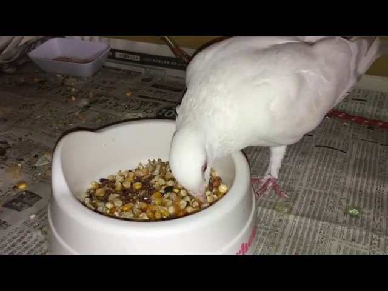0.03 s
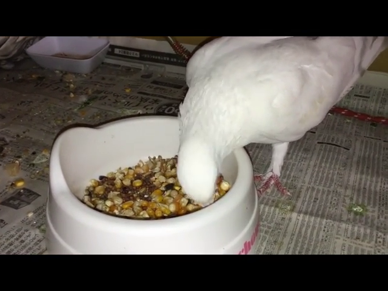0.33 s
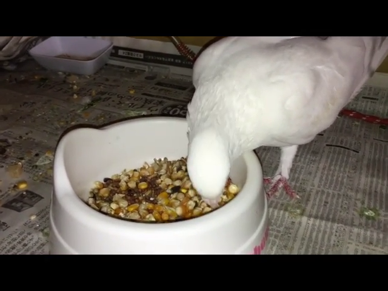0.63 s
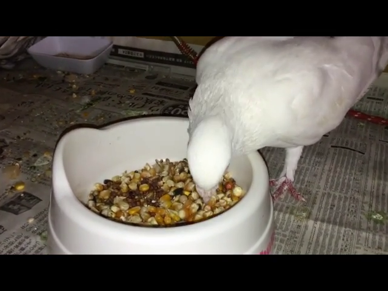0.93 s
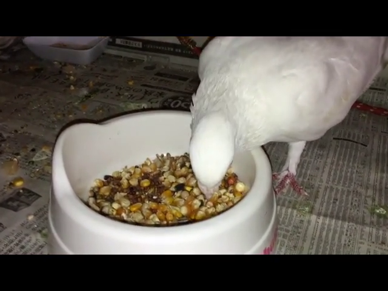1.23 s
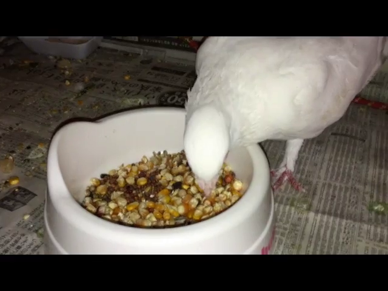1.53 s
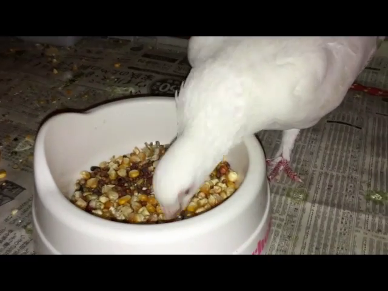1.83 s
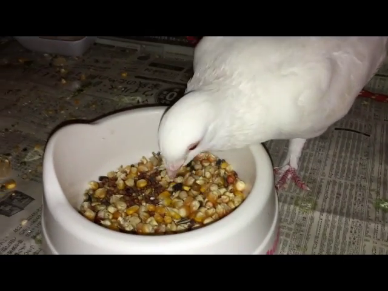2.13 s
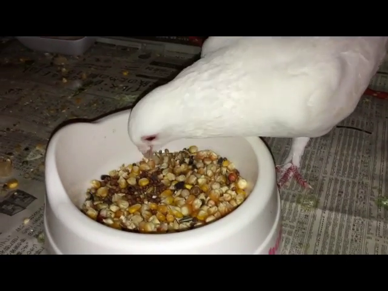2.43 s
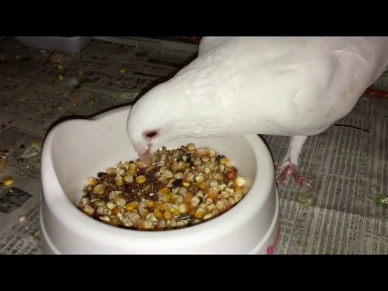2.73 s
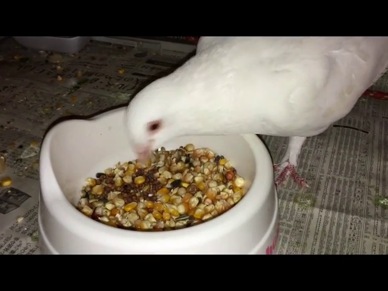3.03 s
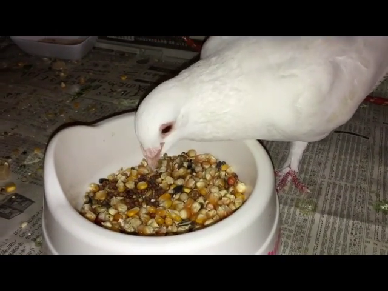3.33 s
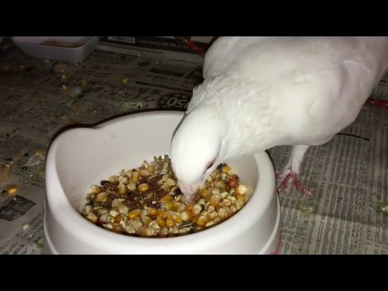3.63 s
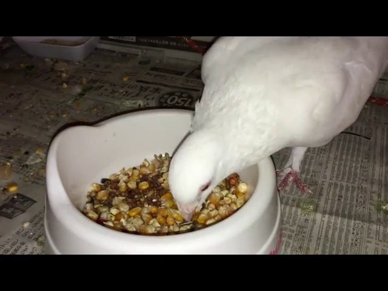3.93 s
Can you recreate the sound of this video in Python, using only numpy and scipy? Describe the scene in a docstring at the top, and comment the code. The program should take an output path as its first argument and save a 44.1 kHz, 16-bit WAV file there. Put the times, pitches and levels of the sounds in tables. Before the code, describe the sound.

A pigeon pecks dry seeds in a plastic bowl, close up in a small room. Short rattles and knocks give way to sparse beak clicks, then one harder knock, while a fan hums and hisses faintly.

```python
"""A pigeon feeds from a plastic bowl of dry seeds, close up in a small room.
From the start a slow fan throbs in the background, with a faint whine and hiss.
For a second the beak digs in: seeds rattle against each other and knock the bowl. After a pause
comes a short dig near 2 s, then sparse dry clicks as the beak snaps on single seeds.
A last dig near 3.9 s lands the hardest knock on the bowl."""
import sys
import numpy as np
from scipy import signal
from scipy.fft import rfft, irfft
from scipy.io import wavfile

SR = 44100
rng = np.random.default_rng(int(sys.argv[2]) if len(sys.argv) > 2 else 0)


def to_wav(s):
    """Save 16-bit WAV."""
    ch = np.atleast_2d(s).T  # columns
    pcm = np.round(np.clip(ch, -1, 1) * 32767)  # PCM
    wavfile.write(sys.argv[1], SR, pcm.astype(np.int16))


N = 176400
TIME = np.arange(N) / SR
FAN_WAVER_HZ = 2.9  # how fast the hum and the whine wander


def from_db(db):
    """Decibels to gain."""
    return 10 ** (np.asarray(db) / 20)


def rms_one(x):
    """Scale to unit rms."""
    return x / np.sqrt(np.mean(x ** 2) + 1e-20)


def at_hz(curve, hz):
    """Read an EQ curve in dB on a log-frequency axis."""
    corners_hz, db = np.transpose(curve)
    return np.interp(np.log(hz + 1e-9), np.log(corners_hz), db)


def noise(colour):
    """Steady noise shaped by an EQ curve, rms 1."""
    hz = np.arange(N // 2 + 1) * SR / N
    white = rfft(rng.standard_normal(N))
    return rms_one(irfft(white * from_db(at_hz(colour, hz)), N))


def drift(rate_hz, size=1024):
    """Smooth random modulation, rms about 1, rolling off above rate_hz."""
    hz = np.arange(size // 2 + 1) * SR / N
    slow = irfft(rfft(rng.standard_normal(size)) / (1 + (hz / rate_hz) ** 2), size)
    return np.interp(np.arange(N) * size / N, np.arange(size), rms_one(slow))


def band(x, hz, width_hz):
    """A resonant band-pass with unity gain at its peak."""
    r = np.exp(-np.pi * abs(width_hz) / SR)
    rung = signal.lfilter([(1 - r * r) / 2], [1, -2 * r * np.cos(2 * np.pi * hz / SR), r * r], x + 1e-18)
    return np.convolve(rung, [1, 0, -1])[:len(x)]


def low_cut(x, hz):
    """Thin out the low end: small bodies radiate little bass."""
    return signal.sosfilt(signal.butter(2, hz, "high", fs=SR, output="sos"), x + 1e-12)


def strike(times, levels_db, ratios, modes):
    """Each blow rings every mode with a strength and a slight lag of its own."""
    max_lag_s, spread_db = 0.0005, 2.0
    out, t = np.zeros(N + SR), TIME[:SR // 20]
    hz, db, t60 = np.transpose(modes)[:, :, None]
    for start, level_db, ratio in zip(times, levels_db, ratios):
        lag = max_lag_s * rng.random(hz.shape) * hz / hz.max()
        age = np.maximum(t - lag, 0)
        gain = from_db(level_db + db + spread_db * rng.standard_normal(hz.shape))
        rings = gain * np.exp(-np.log(1000) * age / t60) * np.sin(2 * np.pi * hz * ratio * age)
        out[int(start * SR):int(start * SR) + len(t)] += rings.sum(axis=0)
    return out[:N]


def fan():
    """Wavering harmonics of the blade rate and air rumble throb unevenly under a steady hiss."""
    # hum of the blades: (multiple of the blade rate, rms level [dB])
    harmonics = [(3, -79.5), (4, -78), (5, -77), (6, -72), (7, -67.5), (8, -71), (9, -61.5), (10, -63.5),
                 (11, -60.5), (12, -55.5), (13, -65.5), (15, -72)]
    # low air noise of fan and room: (frequency [Hz], relative level [dB])
    rumble_colour = [(20, -34), (32, -30), (48, -10), (85, -9), (115, -3), (155, -4.5), (192, 1.5),
                     (215, -5.5), (260, -13), (325, -14.5), (400, -22), (620, -29), (1200, -51)]
    # airy hiss: (frequency [Hz], relative level [dB])
    hiss_colour = [(300, -7), (620, -7.5), (800, 3), (1100, 0), (1400, -2.5), (2100, -6.5), (3300, -11.5),
                   (5000, -15), (6500, -15), (8000, -20.5), (9100, -15), (10300, -24.5), (12500, -20.5),
                   (16000, -29)]
    blade_hz, waver_db, waver_rad = 15.25, 1, 0.22
    rumble_db, hiss_db, throb_db = -55.5, -71, 1.4
    hum = from_db(rumble_db) * noise(rumble_colour)
    for multiple, db in harmonics:
        phase = 2 * np.pi * (round(multiple) * blade_hz * TIME + rng.random())
        phase += waver_rad * drift(FAN_WAVER_HZ)
        hum += np.sqrt(2) * from_db(db + waver_db * drift(FAN_WAVER_HZ)) * np.sin(phase)
    throb = from_db(throb_db * drift(rate_hz=14))
    return hum * throb + from_db(hiss_db) * noise(hiss_colour)


def whine():
    """Narrow bands of noise make a faint airy whine that swings up and down in pitch."""
    # bands of the whine: (centre [Hz], filter width [Hz], rms level [dB])
    bands = [(902.2, 35.5, -75), (981, 70, -79), (1081, 43, -78.5)]
    waver_db, pitch_swing, period_s, crest_s = 2.5, 0.0282, 0.43, 0.17
    out = np.zeros(N)
    for hz, width_hz, db in bands:
        narrow = band(rng.standard_normal(N), hz, width_hz)
        tone = rms_one(band(narrow, hz, 2 * width_hz))
        out += from_db(db + waver_db * drift(FAN_WAVER_HZ)) * tone
    speed = 1 + pitch_swing * np.cos(2 * np.pi * (TIME - crest_s) / period_s)
    return np.interp(np.cumsum(speed) % N, np.arange(N), out)  # varispeed vibrato


def room(x):
    """The direct sound, a few close reflections and a short dull tail."""
    # reflections off the bowl wall and floor: (delay [s], level [dB])
    echoes = [(.0017, -15.5), (.0045, -12.5), (.0069, -14.5)]
    t60_s, build_s, tail_db, damping_hz = 0.23, 0.0027, -16, 5970
    t = TIME[:SR // 2]
    tail = rng.standard_normal(len(t)) * np.exp(-np.log(1000) * t / t60_s) * np.minimum(t / build_s, 1)
    tail = signal.sosfilt(signal.butter(1, damping_hz, fs=SR, output="sos"), tail)
    response = from_db(tail_db) * tail / np.linalg.norm(tail)
    for delay, db in echoes:
        response[int(delay * SR)] += from_db(db)
    return x + signal.fftconvolve(x, response)[:N]


def beak_snaps():
    """The beak closes on one seed: a dry click layered from low thud, body and bright tip."""
    # snaps: (time [s], level [dB], thud offset [dB], tip offset [dB], pitch ratio)
    cues = [(0.031, -52.5, -4, 0, 0.88), (.6985, -49, 6, 4.5, .93), (0.7519, -59, 6, 9.5, 0.94),
            (0.9541, -46.5, 6, 10.5, .94), (2.0439, -47.5, -8, 5, 0.81), (2.0481, -50.5, 0, -1, 0.96),
            (2.095, -49.5, 9, -3, 1.06), (2.1485, -36.5, -7, 1, 1.02), (2.2648, -40.5, 7.5, 4.5, 1.02),
            (2.2758, -52, 8, 14, .98), (2.465, -60, 20, -8, 0.84), (2.6914, -55.5, -11, -6, 0.98),
            (3.1812, -59.5, 9, 8, 1.1), (3.5527, -41, 4, -12, .96), (3.612, -66, -4, -3, .9)]
    # modes of the three layers: (frequency [Hz], level [dB], t60 [s])
    thud_modes = [(736, -20, 0.02), (1140, -14, 0.017), (1300, -30, .015)]
    body_modes = [(2170, -14.5, 0.011), (3400, -5.5, 0.0063), (4270, -5, .005), (6350, -8.5, 0.0035),
                  (8950, -6.5, 0.0026)]
    tip_modes = [(11350, -10.5, 0.0035), (12900, -7, .003), (14600, -9, 0.003)]
    times, db, thud_db, tip_db, ratios = np.transpose(cues)
    thud = low_cut(strike(times, db + thud_db, ratios, thud_modes), hz=403)
    body = low_cut(strike(times, db, ratios, body_modes), hz=2000)
    tip = low_cut(strike(times, db + tip_db, ratios, tip_modes), hz=8000)
    return thud + body + tip


def seed_rattles():
    """While the beak pushes, seeds collide at random; each contact rings briefly at its own pitch."""
    # pushes: (time [s], length [s], level [dB], dull rub [dB], crisp edge [dB], colour shift [ratio])
    cues = [(.044, 0.02, -48, -2, -3, 1.13), (0.079, 0.02, -61.5, -8, -5, 1.15),
            (.374, .009, -54, 3.5, 0, 1.02), (.384, 0.0047, -53, -3, 4, 1.02),
            (0.395, 0.012, -58, 5, 1, 1.1), (0.441, 0.0094, -70, 10, -2, 1.2),
            (0.584, 0.017, -48.5, 0.5, -3, 1.12), (0.606, 0.0071, -50, -2, -3, 0.98),
            (0.623, 0.04, -59, -6, -2, 1.06), (0.742, 0.012, -67, 12, -5, 0.99),
            (0.959, .012, -54, 5.5, -9, 0.97), (0.974, 0.0084, -57.5, 1, -1.5, 1.03),
            (1.014, 0.027, -68, -9, -13, 0.92), (1.963, 0.0062, -57, 4, 8, 0.97),
            (1.972, 0.011, -49, 1.5, 4, 0.97), (1.995, .018, -68.5, 5, 2, 1.1),
            (3.545, 0.003, -63, -6, 2, 1.5), (3.886, 0.014, -49, -1, 5.5, 0.33),
            (3.902, 0.01, -46, -3, 7, 0.97), (3.916, 0.0053, -37.5, -9, -10, 0),
            (3.941, .02, -64, -8, 0, 1.15)]
    # colour of seed-on-seed contacts: (frequency [Hz], relative level [dB])
    seed_colour = [(600, -14.5), (740, 5), (900, -5), (1150, 3.5), (1600, -15.5), (2300, 8), (2900, -2.5),
                   (3800, -7.5), (5600, -13), (8000, -19.5), (10000, -24.5), (12000, -21), (16000, -31)]
    contacts_per_s, spread_db, t60_cycles = 5000, 5.5, 24.6
    attack_s, release_s = 0.002, 0.0043
    dull_below_hz, crisp_above_hz = 1700, 4300
    pitches = np.geomspace(600, 15000, 22)
    t = TIME[:SR // 10]
    shape = (len(pitches), len(t))
    clicks = np.zeros((len(pitches), N + len(t)))
    for start, length, db, dull_db, crisp_db, shift in cues:
        colour = from_db(at_hz(seed_colour, pitches / abs(shift))) * np.sqrt(pitches)
        colour /= np.linalg.norm(colour)
        shelves_db = dull_db * (pitches < dull_below_hz) + crisp_db * (pitches > crisp_above_hz)
        gain = colour * from_db(db + shelves_db)
        push = np.minimum(t / attack_s, 1) * np.exp(-np.maximum(t - length, 0) / release_s)
        sizes = from_db(spread_db * np.minimum(rng.exponential(1, shape), 3))
        polarity = rng.choice([-1, 1], shape)
        hits = (rng.random(shape) < contacts_per_s / len(pitches) / SR) * sizes * polarity * push
        # the push sets the total energy, however many contacts fall in it
        hits *= np.sqrt(len(pitches) * np.sum(push ** 2) / (np.sum(hits ** 2) + 1e-12))
        clicks[:, int(start * SR):int(start * SR) + len(t)] += gain[:, None] * hits
    out = np.zeros(N)
    for train, hz in zip(clicks[:, :N], pitches):
        width_hz = hz * np.log(1000) / (np.pi * t60_cycles)
        makeup_gain = np.sqrt(SR / (np.pi * width_hz))
        out += makeup_gain * band(train, hz, width_hz)
    return low_cut(out, hz=500)


def bowl_knocks():
    """A seed is driven against the bowl: the plastic knocks and the husks add a crisp edge."""
    # knocks: (time [s], level [dB], husk offset [dB], pitch ratio)
    cues = [(.0420, -38.5, -12, 0.98), (0.051, -47, -5, 1.06), (.0570, -39, 3, 1.19),
            (0.0908, -53, -3, 1.13), (.1530, -56, 0, 1.34), (0.373, -46.5, -2, 0.95),
            (0.3843, -36.5, 9, 1.1), (.4069, -54, 3, 1.1), (.5023, -62, -3, 1.03), (0.584, -43, 3, 1.05),
            (.5876, -47, 1, 1.06), (0.5892, -42.5, 0, 1.2), (.6547, -52, -5, 1), (0.7467, -48, -8, 1.02),
            (1.974, -47, 10, 0.89), (1.9855, -50, -3, 1), (3.8871, -34, -10, 0.91), (3.8955, -42, 6, 1.1),
            (3.906, -38, 13, 1.1), (3.9103, -37, -4, 1.03), (3.9189, -21, -4, 1.03),
            (3.9762, -48, -8, 0.89)]
    # modes of the filled bowl and of the seed husks: (frequency [Hz], level [dB], t60 [s])
    bowl_modes = [(740, -35, 0.026), (1138, -26, 0.031), (1270, -37, 0.029), (1600, -32, .025),
                  (2032, -15.5, 0.028), (2230, -11, 0.038), (2450, -17, 0.0096), (2610, -6.5, 0.022),
                  (2955, -12.5, 0.016), (3270, -12, .008)]
    husk_modes = [(4240, -17, 0.0088), (4900, -19, 0.018), (5040, -30, .02), (5440, -17.5, 0.023),
                  (6260, -18, 0.01), (6850, -22, 0.0034), (7900, -18.5, 0.008), (9100, -24, .004),
                  (11100, -19, .004), (14300, -25, .003)]
    times, db, husk_db, ratios = np.transpose(cues)
    bowl = low_cut(strike(times, db, ratios, bowl_modes), hz=637)
    husks = low_cut(strike(times, db + husk_db, ratios, husk_modes), hz=3540)
    return bowl + husks


def scene():
    """The feeding bird in the room, over a bed of fan and whine, in mono."""
    feeding = seed_rattles() + bowl_knocks() + beak_snaps()
    return (room(feeding) + fan() + whine())[None]


def record(dry):
    """A steep high cut at 16 kHz."""
    return signal.sosfilt(signal.ellip(10, .1, 70, 16000, fs=SR, output="sos"), dry)


dry = scene()
out = record(dry)
to_wav(out)
```